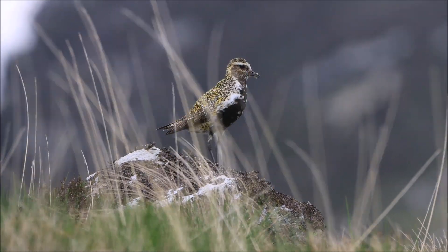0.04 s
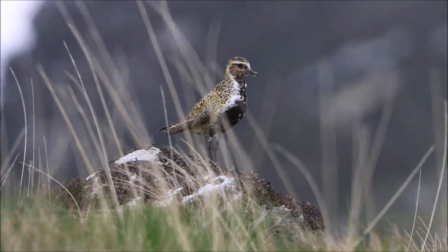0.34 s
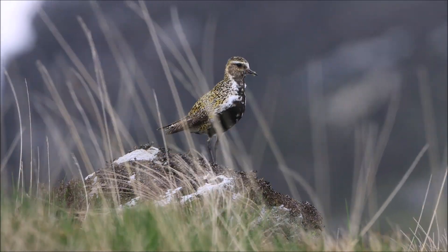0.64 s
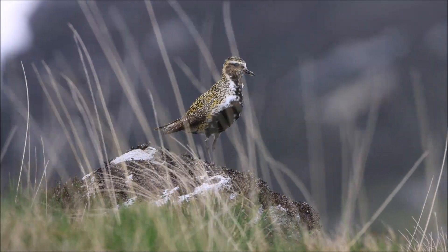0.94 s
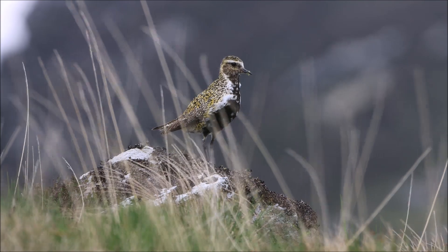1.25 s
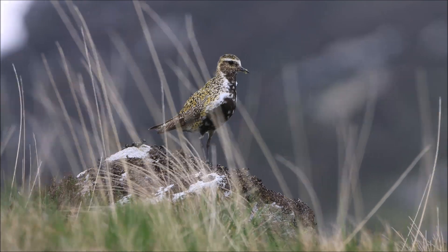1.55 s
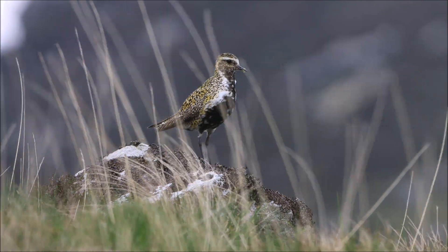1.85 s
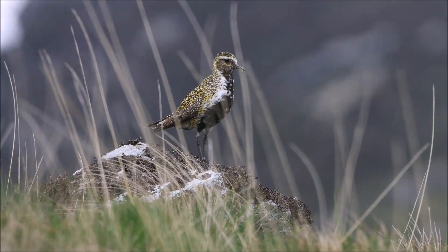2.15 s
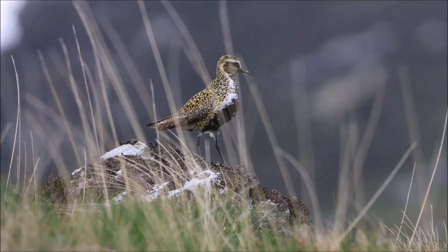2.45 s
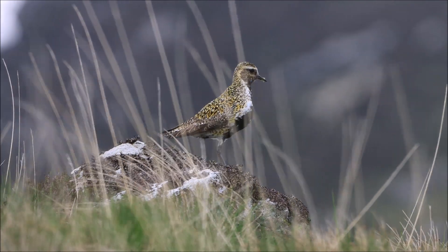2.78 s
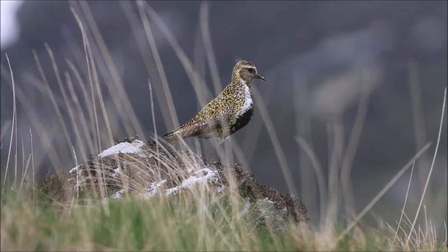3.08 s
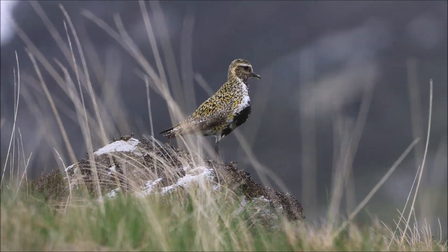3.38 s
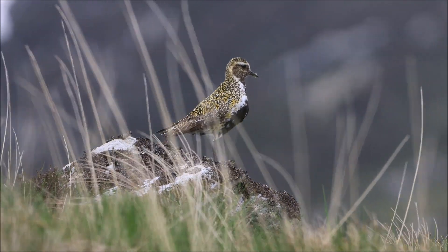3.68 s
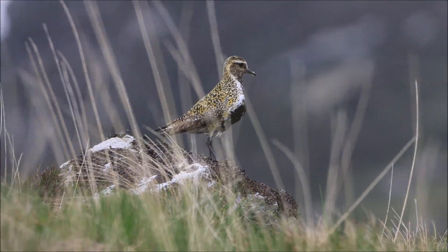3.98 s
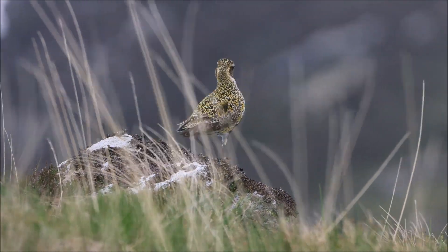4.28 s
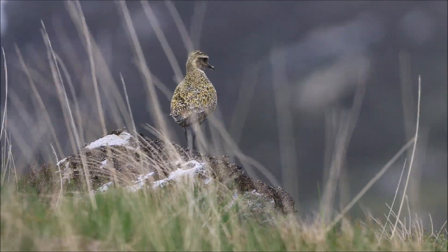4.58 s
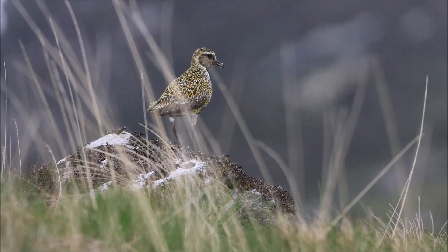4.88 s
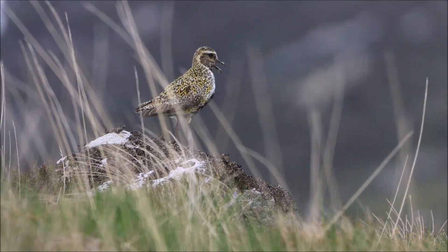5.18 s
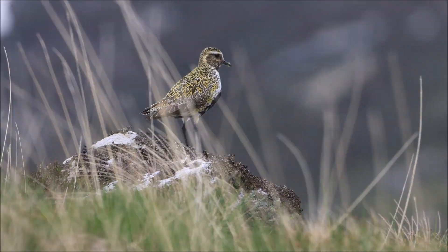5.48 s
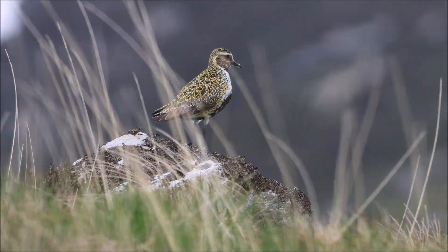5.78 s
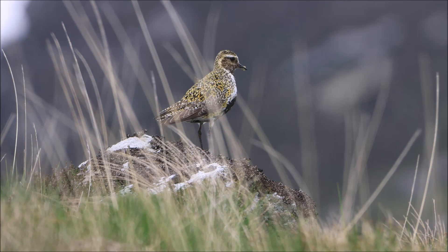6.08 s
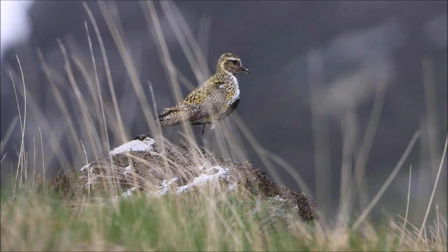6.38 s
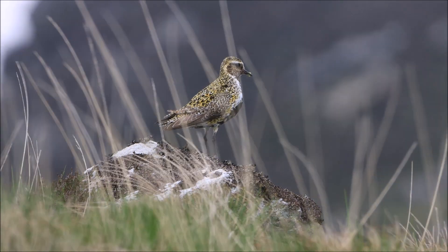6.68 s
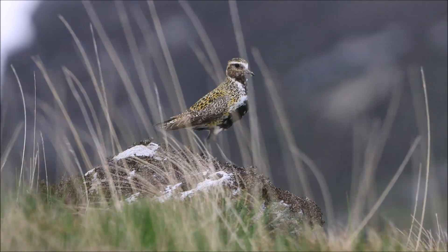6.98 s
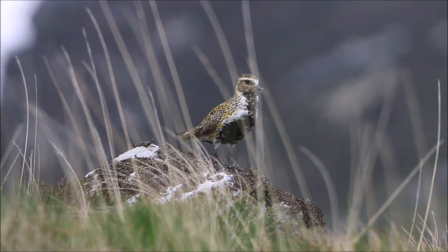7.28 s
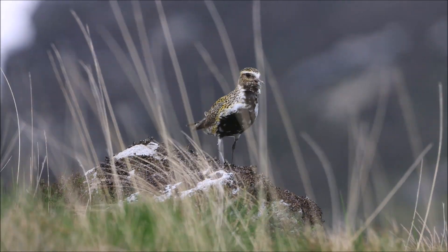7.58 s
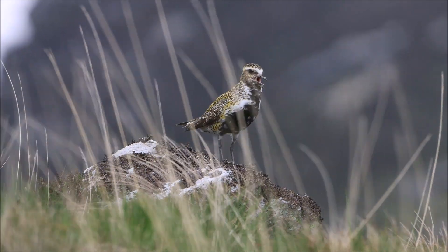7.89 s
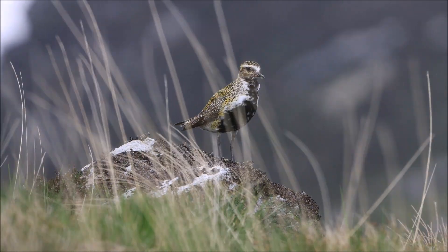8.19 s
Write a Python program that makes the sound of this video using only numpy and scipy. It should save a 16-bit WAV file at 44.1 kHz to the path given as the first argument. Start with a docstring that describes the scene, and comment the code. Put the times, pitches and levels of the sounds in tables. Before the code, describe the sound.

A plover gives sparse, clear rising whistles over a faint moorland hush, with sharp microphone knocks, handling ticks and gusts of wind buffeting the microphone.

```python
"""Open moorland: the tail of a golden plover's whistle gives way to a far hush of air and small ticks
from handling the camera. Between 1 and 2 s, sharp knocks hit the left microphone port; the hardest
overload it and a limiter ducks for a moment. From 3 s, gusts buffet the two ports separately. At 5 s
the plover pipes a clear, rising whistle through the wind, and the camera mount clacks just after.
The gusts ease, and a last whistle rises at 7.7 s."""
import sys
import numpy as np
from scipy import signal
from scipy.fft import rfft, irfft
from scipy.io import wavfile
from scipy.ndimage import uniform_filter1d, minimum_filter1d

SR = 44100
rng = np.random.default_rng(int(sys.argv[2]) if len(sys.argv) > 2 else 0)


def wrap_up_sound(samples):
    """Save the sound to the file named by the first command line argument, as 16-bit audio."""
    columns = np.atleast_2d(samples).T
    # keep every value between -1 and 1, then stretch to whole-number steps
    tamed = np.clip(columns, -1, 1)
    steps = np.round(tamed * 32767).astype(np.int16)
    wavfile.write(sys.argv[1], SR, steps)


N = 363384
TIME = np.arange(N) / SR

# tone colour of the far hush: frequency_hz, density_db
AIR_SPECTRUM = [(40,1), (110,-5), (210,2), (340,-3), (500,-4), (850,-10.5), (1250,-15.5), (2000,-14.5),
                (2500,-19), (3500,-22.5), (7000,-27.5), (10000,-31), (12500,-29.5), (16000,-41)]
# narrow ridges that colour the hush: centre_hz, width_hz, boost_db
AIR_RIDGES = [(986,59,1.5), (1440,25,4), (1647,26,6), (2017,66,4)]
# how alike the hush is at the two ports: frequency_hz, correlation
AIR_LIKENESS = [(60,0.94), (290,0.76), (640,0.49), (1400,0), (16000,0)]
# the hush's swell, and the recorder's wind filter thinning the bass after the hard knocks and
# the first big gust: time_s, swell_db, wind_filter_hz
HUSH_CURVES = [(0, -3.5, 60), (.7, -2.5, 70), (1.6, -2, 70), (1.8, -3.5, 280), (2.3, -3.5, 165),
               (3.1, 0.5, 90), (3.55, -4, 193), (4.1, -3, 100), (5, 1.5, 80), (8.2, 0, 70)]
# tone colour of turbulence at a port: frequency_hz, density_db
RUMBLE_SPECTRUM = [(20,-31), (45,-5), (90,4), (200,-4), (350,-12.5), (550,-24.5), (900,-38.5), (1600,-52),
                   (4000,-65)]
# gusts on the microphone: start_s, length_s, level_db, left_vs_right_db, deep_eddies_db, fine_eddies_db
MIC_GUSTS = [(0.647, 0.034, -52.5, -12, 1, -8), (1.198, 0.28, -56, -16, 7, -10),
             (3.161, 0.22, -27.5, -6, 3, -10), (4.069, 0.17, -30.5, -11.5, -28, -2.5),
             (4.336, 0.17, -37.5, -13, -3, -6), (4.721, 0.11, -41, -6.5, 14, -17),
             (4.88, 0.12, -31.5, -13, -2, -12), (5.023, 0.075, -24.5, -3.5, 0.5, -17),
             (5.131, 0.11, -36, -5, 2, -4), (5.289, 0.75, -38, -7, 6, 3.5),
             (5.511, 0.03, -20.5, -16, -9, -2), (5.68, 0.14, -25, -22, 0.5, -2),
             (6.115, .15, -29.5, -5.5, -6, -7.5), (6.45, 0.14, -26, -10, -1, -11),
             (6.659, 0.058, -29, -17, -7, -5.5), (6.801, 0.12, -27.5, -16, 0, -2.5),
             (6.977, 0.073, -47.5, 4, 11, -8), (7.228, 0.29, -43, -13, 6, -10),
             (7.701, 0.35, -46.5, -14, 9, -10)]
# the hardest eddies: centre_s, level_db, pitch_hz, port (0 left, 1 right)
HARD_EDDIES = [(1.193, -28.5, 124, 1), (1.1987, -33, 696, 1), (3.189, -15, 150, 1), (3.207, -11, 120, 0),
               (3.281, -9, 160, 1), (3.363, -11, 154, 0), (4.108, -18, 335, 1), (4.1311, -24, 487, 1),
               (4.399, -19.5, 230, 1), (4.913, -18, 200, 1), (5.0626, -11.5, 376, 0), (5.068, -7, 91.3, 0),
               (5.214, -18.5, 166, 0), (5.5246, -21.5, 495, 1), (5.7519, -17, 420, 1),
               (5.757, -9.5, 193, 1), (6.206, -9.5, 430, 1), (6.224, -6.5, 162, 1), (6.52, -13.5, 166, 1),
               (6.538, -21.5, 404, 1), (6.684, -16.5, 332, 1)]
# ringing modes of the camera mount: pitch_hz, level_db, t60_s
MOUNT_MODES = [(708,-2.5,0.071), (910,-6,0.063), (1086,-1,0.05), (1375,4,0.025), (1490,-2.5,0.028),
               (2240,-21,0.012), (3660,-68,0.0091), (5960,-27,0.0091), (8340,-18.5,0.014)]
# the clearest handling ticks: start_s, snap_db, left_vs_right_db, snap_centre_hz, ring_db
HANDLING_TICKS = [(0.2796, -37.5, -9, 4140, -54), (0.662, -49, 2, 2800, -39),
                  (0.803, -35.5, -5, 5040, -37.5), (1.783, -31, -5, 5000, -46),
                  (1.796, -31.5, -10, 890, -48), (2.0462, -35, -5, 6850, -41),
                  (2.463, -37.5, -6, 2370, -32), (2.625, -51, -5, 3000, -38),
                  (4.0029, -39, -7, 2970, -41.5), (5.9783, -33.5, -1, 3930, -36.5),
                  (6.858, -55, 1, 2000, -33.5), (7.22, -56, 3, 3000, -38), (7.383, -49, 2, 6000, -40),
                  (7.5362, -49, -5, 2800, -38.5), (7.906, -42, -2, 2800, -36), (8.062, -43, -6, 3430, -40)]
# clacks of the mount: start_s, level_db, catch_delay_s
MOUNT_CLACKS = [(5.315,-21.5,0.0059), (5.3541,-22.5,0.0064), (5.3952,-22,0.00349), (5.715,-22.5,0.0034)]
# knocks on the left port: start_s, push_db, leak_s, high_cut_hz
PORT_KNOCKS = [(1.1632,1.5,0.00077,3250), (1.6516,12.5,0.00079,2600), (1.6716,7,0.0028,4440),
               (1.6777,-3,0.0015,4000), (1.6858,-25,.0002,9000), (1.7005,-17,0.0014,595)]
# pitch gesture of every whistle: share_of_length, share_of_rise
WHISTLE_GLIDE = [(0, .08), (.18, 0), (.36, .13), (.6, .56), (.72, .7), (.87, 0.75), (1, 1)]
# the voice swells as it rises, brightest midway: share_of_length, tone_db, octave_db
WHISTLE_SWELL = [(0, -3, -17), (.04, -4, -12.5), (.085, -2, -20), (.17, -3.5, -14), (.35, -2.5, -12.5),
                 (.54, 0, -8), (.68, 0, -10), (.85, 0, -11.5), (1, -0.5, -20)]
# the bird's colour at the left port: frequency_hz, gain_db
BIRD_LEFT_EQ = [(2100, -11.5), (2160, -7), (2290, -.5), (2400, -4.5), (4200, -10), (4350, 2.5), (4660, -3),
                (4780, -28), (6300, -2.5)]
# the whistles, the first already under way:
# start_s, length_s, pitch_hz, rise_hz, level_db, overtones_db, third_vs_octave_db, right_dip_hz
PLOVER_WHISTLES = [(-0.33, 0.4, 2292, 109.7, -31, 0, -32, 4500),
                   (5.012, 0.397, 2145, 268, -39, -1.5, -13, 4640),
                   (7.708, 0.403, 2106, 264, -37, -4.5, -19, 4740)]


def amp(db):
    """Decibels to gain."""
    return 10 ** (np.asarray(db) / 20)


def unit(x):
    """Scales to rms 1."""
    return x / np.sqrt(np.mean(x ** 2) + 1e-20)


def curves(rows, t):
    """A table's columns as automation curves at the times t."""
    times, *columns = np.transpose(rows)
    return [np.interp(t, times, column) for column in columns]


def spectrum_at(points, hz):
    """Reads a curve on a log-frequency axis."""
    points_hz, values = np.transpose(points)
    return np.interp(np.log(hz + 1), np.log(points_hz + 1), values)


def add(mix, start_s, sound):
    """Lays a sound into the mix."""
    part = mix[:, max(round(start_s * SR), 0):][:, :sound.shape[1]]
    part += sound[:, :part.shape[1]]


def panned(balance_db):
    """Left and right gains whose mean is 1."""
    ratio = amp(np.atleast_1d(balance_db))
    return 2 * np.array([ratio, np.ones_like(ratio)]) / (1 + ratio)


def filtered(x, hz, kind, order=2):
    """Butterworth filter."""
    return signal.sosfilt(signal.butter(order, hz, kind, fs=SR, output="sos"), x)


def wander(size, rate_hz):
    """Smooth random modulation of rms 1, rolling off above rate_hz."""
    hz = np.fft.rfftfreq(size, 1 / SR)
    return unit(irfft(rfft(rng.standard_normal(size)) / (1 + (hz / rate_hz) ** 4), size))


def air(level_db=-52, patch_db=2.44, breeze_hz=2000):
    """The bed: far wind over the moor, alike at both ports in the bass, under an even hiss."""
    hz = np.fft.rfftfreq(1024, 1 / SR)
    t = np.arange(N // 256 + 5) * 256 / SR
    left_re, left_im, apart_re, apart_im, patches = rng.standard_normal((len(t), len(hz), 5)).T
    likeness = spectrum_at(AIR_LIKENESS, hz)[:, None]
    left = left_re + 1j * left_im
    right = likeness * left + np.sqrt(1 - likeness ** 2) * (apart_re + 1j * apart_im)
    ridges_db = sum(db * np.exp(-((hz - centre) / width) ** 2) for centre, width, db in AIR_RIDGES)
    colour_db = spectrum_at(AIR_SPECTRUM, hz) + ridges_db
    # the breeze stirs the lows and mids in soft patches of pitch and time
    patches = unit(uniform_filter1d(uniform_filter1d(patches, size=12, axis=0), size=7, axis=1))
    swell_db, wind_filter_hz = curves(HUSH_CURVES, t)
    breeze_db = (swell_db + patch_db * patches) / (1 + (hz[:, None] / breeze_hz) ** 2)
    wind_filter = 1 / np.hypot(1, (wind_filter_hz / (hz[:, None] + 1)) ** 2)
    frames = np.array([left, right]) * amp(colour_db[:, None] + breeze_db) * wind_filter
    hush = signal.istft(frames, nperseg=1024, noverlap=768)[1][:, :N]
    return amp(level_db) * unit(hush)


def turbulence(size, deep_db, fine_db, deep_hz=95, fine_hz=370, lump_db=4.0, spurt_db=4.5):
    """Lumpy low pressure noise at one port; its finer eddies come in short spurts."""
    hz = np.fft.rfftfreq(size, 1 / SR)
    rumble = rfft(rng.standard_normal(size)) * amp(spectrum_at(RUMBLE_SPECTRUM, hz))
    deep, coarse = (irfft(rumble / (1 + (hz / edge_hz) ** 6), size) for edge_hz in (deep_hz, fine_hz))
    fine = (irfft(rumble, size) - coarse) * amp(fine_db + spurt_db * wander(size, rate_hz=65))
    eddies = deep * amp(deep_db) + (coarse - deep) + fine
    return unit(eddies * amp(lump_db * wander(size, rate_hz=35)))


def draught(level_db=-68.5, reference_hz=70):
    """A faint low stir at each port, which fades as the wind filter's cutoff rises."""
    _, wind_filter_hz = curves(HUSH_CURVES, TIME)
    stir = np.array([turbulence(N, deep_db=-3, fine_db=-12) for port in range(2)])
    return amp(level_db) * (reference_hz / wind_filter_hz) ** 2 * stir


def gusts(rise_s=0.013, fall_s=0.023):
    """A gust rises quickly, holds and dies away, with its own turbulence at each port."""
    out, t = np.zeros((2, N)), np.arange(-SR // 10, SR * 11 // 10) / SR
    for start_s, length_s, db, pan_db, deep_db, fine_db in MIC_GUSTS:
        force = np.exp(np.minimum(t, 0) / rise_s - np.maximum(t - length_s, 0) / fall_s)
        ports = np.array([unit(force * turbulence(len(t), deep_db, fine_db)) for port in range(2)])
        gains = amp([[db + pan_db], [db]]) * np.sqrt(np.mean(force ** 2))
        add(out, start_s + t[0], gains * ports)
    return out


def buffets(width_cycles=0.32, sag=0.32, trim_db=1.5):
    """An eddy shoves one port for a cycle or two, slowing as it passes."""
    out, t = np.zeros((2, N)), np.arange(-SR // 40, SR // 40) / SR
    for centre_s, db, hz, port in HARD_EDDIES:
        cycles = hz * t
        phase = 2 * np.pi * (cycles - sag * np.log(np.cosh(cycles)) + rng.random())
        shove = amp(db + trim_db) * np.sin(phase) / np.cosh(cycles / width_cycles)
        add(out, centre_s + t[0], np.outer([port == 0, port == 1], shove))
    return out


def mount_ring(t, detune=0.013, rattle_hz=(750, 2000), rattle_db=-3, rattle_s=0.0028):
    """One blow on the camera mount: its modes, blurred by a short rattle of loose parts."""
    ring = 0
    for hz, db, t60_s in MOUNT_MODES:
        cycles = hz * (1 + detune * rng.standard_normal()) * t + rng.random((2, 1))
        ring += amp(db - 60 * t / t60_s) * np.sin(2 * np.pi * cycles)
    ring /= np.linalg.norm([amp(db) for _, db, _ in MOUNT_MODES])
    rattle = unit(filtered(rng.standard_normal((2, len(t))), rattle_hz, "band"))
    return (ring + amp(rattle_db) * rattle * np.exp(-t / rattle_s)) / 2


def ticks(decay_s=0.00047, body_cycles=2.9, spread=1.42, snap_trim_db=-6.5, faint_count=14):
    """Tiny dry handling snaps, each ringing the mount a little; fainter ones fall at random."""
    out, t = np.zeros((2, N)), TIME[:SR // 20]
    faint_ticks = [(when * N / SR, -48, 0, 5400 * 2 ** (colour - .5), -46)
                   for when, colour in rng.random((faint_count, 2))]
    for start_s, snap_db, pan_db, hz, ring_db in HANDLING_TICKS + faint_ticks:
        noise = rng.standard_normal((2, len(t)))
        fizz = unit(filtered(noise, [hz / spread, hz * spread], "band", order=1))
        snap = amp(snap_db + snap_trim_db) * fizz * np.exp(-t / (decay_s + body_cycles / hz))
        add(out, start_s, panned(pan_db) * (snap + amp(ring_db) * mount_ring(t)))
    return out


def clacks(snap_s=0.0018, high_cut_hz=9000, slip_snap_db=-22, catch_snap_db=-16):
    """The mount slips and catches: two quick snaps ring the same modes."""
    out, t = np.zeros((2, N)), TIME[:SR // 10]
    for start_s, db, delay_s in MOUNT_CLACKS:
        slip = (start_s, db, slip_snap_db)
        catch = (start_s + delay_s, db - 0.5, catch_snap_db)
        for at_s, blow_db, snap_db in (slip, catch):
            snap = filtered(rng.standard_normal((2, len(t))) * np.exp(-t / snap_s), high_cut_hz, "low")
            add(out, at_s, amp(blow_db) * (mount_ring(t) + amp(snap_db) * snap))
    return out


def knocks(low_cut_hz=85, q=0.8, far_db=-18, far_hz=230):
    """A pressure step leaks away and rebounds through the bass cut; the far port gets a dull thud."""
    push, t = np.zeros((1, N)), TIME[None, :SR // 20]
    for start_s, db, leak_s, high_cut_hz in PORT_KNOCKS:
        add(push, start_s, amp(db) * filtered(np.exp(-t / leak_s), high_cut_hz, "low", order=1))
    omega = 2 * np.pi * low_cut_hz
    bass_cut = signal.bilinear([1, 0, 0], [1, omega / q, omega ** 2], SR)
    near = signal.lfilter(*bass_cut, push[0])
    far = amp(far_db) * filtered(near, far_hz, "low", order=1)
    return np.array([near, far])


def whistle(start_s, length_s, pitch_hz, rise_hz, level_db, overtones_db, third_db, dip_hz,
            attack_s=0.0012, release_s=0.021, settle_s=0.0015, dip_db=-11, dip_width_hz=60):
    """A near-pure tone drops onto its pitch, then glides up; its overtones swell and fade per port."""
    t = TIME[:SR // 2]
    risen, = curves(WHISTLE_GLIDE, t / length_s)
    # muscles bend the pitch smoothly
    glide_hz = uniform_filter1d(pitch_hz + rise_hz * risen, size=1500, mode="nearest")
    drop = 0.11 * np.exp(-t / settle_s)
    jitter = 0.0014 * wander(len(t), rate_hz=170)
    hz = glide_hz * (1 + drop + jitter)
    phase = 2 * np.pi * np.cumsum(hz) / SR + np.array([[0], [.3]])  # the right port leads a little
    tone_db, octave_db = curves(WHISTLE_SWELL, t / length_s)
    octave_db += overtones_db + 1.4 * wander(len(t), rate_hz=62)  # overtones flutter the most
    tone_db += 0.4 * wander(len(t), rate_hz=90)
    voice = 0
    for k, partial_db in enumerate([tone_db, octave_db, octave_db + third_db], 1):
        left_db = spectrum_at(BIRD_LEFT_EQ, k * hz)
        right_db = dip_db * np.exp(-((k * hz - dip_hz) / dip_width_hz) ** 2)
        voice += amp(level_db + partial_db + np.array([left_db, right_db])) * np.sin(k * phase)
    attack = np.minimum(t / attack_s, 1)
    release = np.sin(np.pi / 2 * np.clip((length_s - t) / release_s, 0, 1)) ** 2
    return (voice * attack * release)[:, start_s + t >= 0]


def plover(scatter_db=-31, t60_s=0.2):
    """The bird's whistles, with a trace of scatter from rocks and grass."""
    direct, t = np.zeros((2, N)), TIME[:SR // 2]
    for start_s, *voicing in PLOVER_WHISTLES:
        add(direct, start_s, whistle(start_s, *voicing))
    tail = rng.standard_normal((2, len(t))) * amp(-60 * t / t60_s)
    scatter = signal.fftconvolve(direct, tail / np.linalg.norm(tail[0]), axes=1)[:, :N]
    return direct + amp(scatter_db) * scatter


def scene():
    """The dry mix: bird, moor, wind on the microphone and handling."""
    return plover() + air() + draught() + gusts() + buffets() + knocks() + clacks() + ticks()


def limiter(x, threshold_db=3.0, hold_s=0.092, recovery_db_per_s=190, attack_hz=45):
    """Ducks both channels after an overload, holds, then recovers."""
    over_db = np.maximum(20 * np.log10(abs(x).max(0) + 1e-9) - threshold_db, 0)
    hold = 2 * int(hold_s * SR / 2) + 1
    held_db = -minimum_filter1d(-over_db, hold, origin=hold // 2)
    recovery_db = TIME * recovery_db_per_s
    duck_db = np.maximum.accumulate(held_db + recovery_db) - recovery_db
    return x * amp(-filtered(duck_db, attack_hz, "low", order=1))


def record(dry, notch_hz=4970, notch_width_hz=60, high_cut_hz=15900):
    """Knocks clip past the slow limiter and faintly ring narrow whine filters; a high cut follows."""
    x = np.clip(limiter(dry), -1, 1)
    for k in range(1, 4):
        x = signal.lfilter(*signal.iirnotch(k * notch_hz, notch_hz / notch_width_hz, SR), x)
    high_cut = signal.firwin(511, high_cut_hz, window=("kaiser", 9), fs=SR)
    return signal.oaconvolve(x, high_cut[None], "same")


dry = scene()
out = record(dry)
wrap_up_sound(out)
```